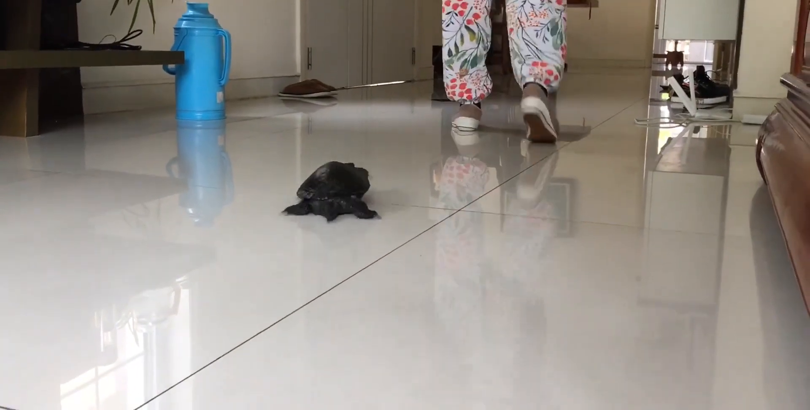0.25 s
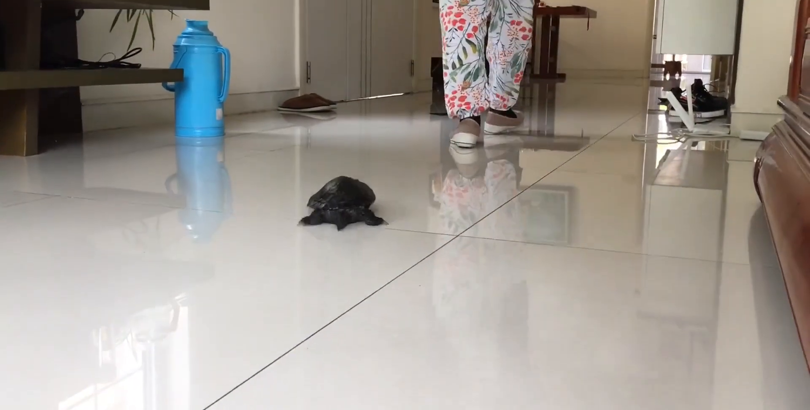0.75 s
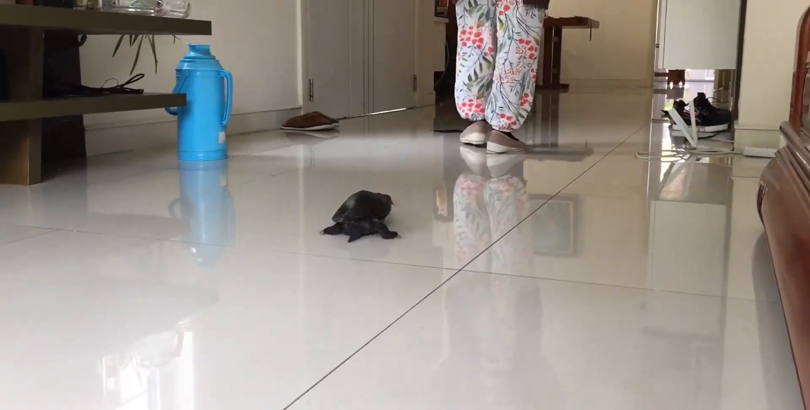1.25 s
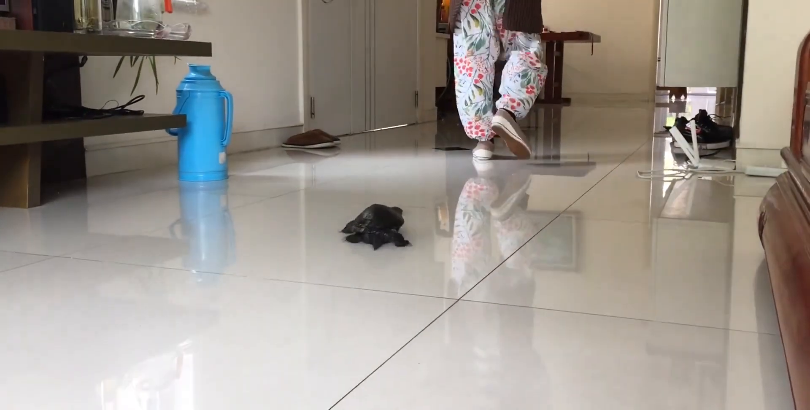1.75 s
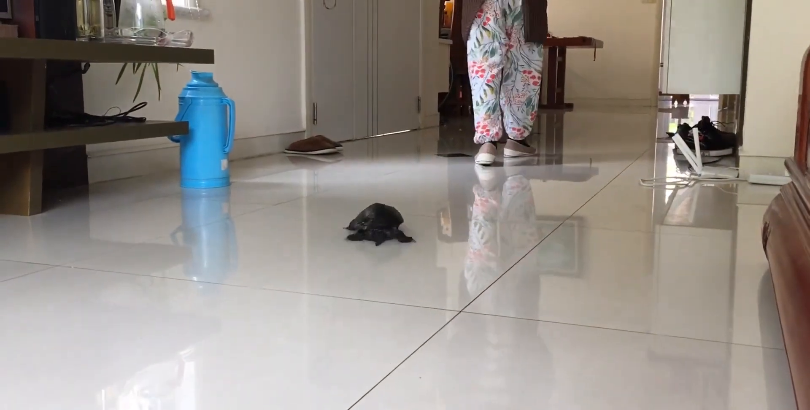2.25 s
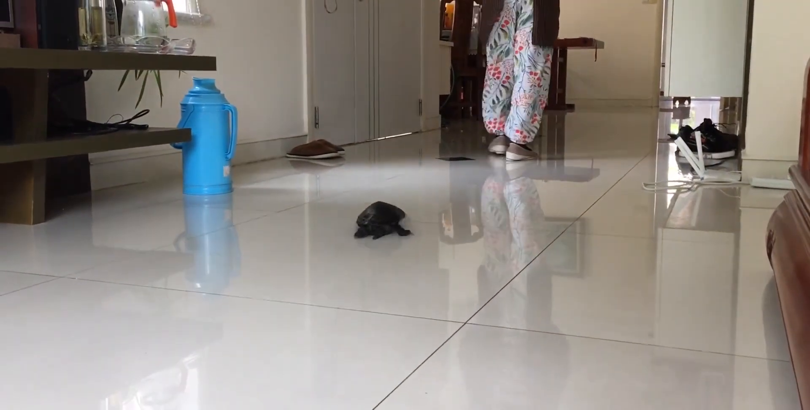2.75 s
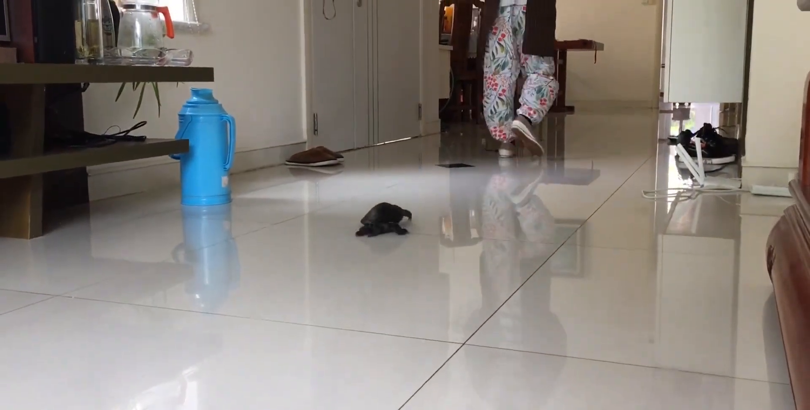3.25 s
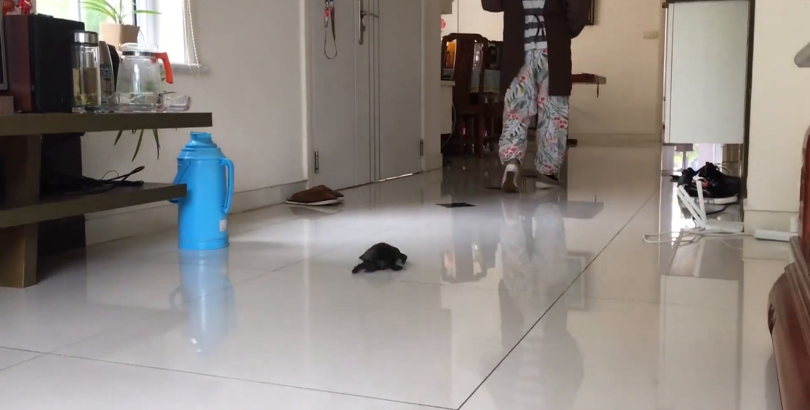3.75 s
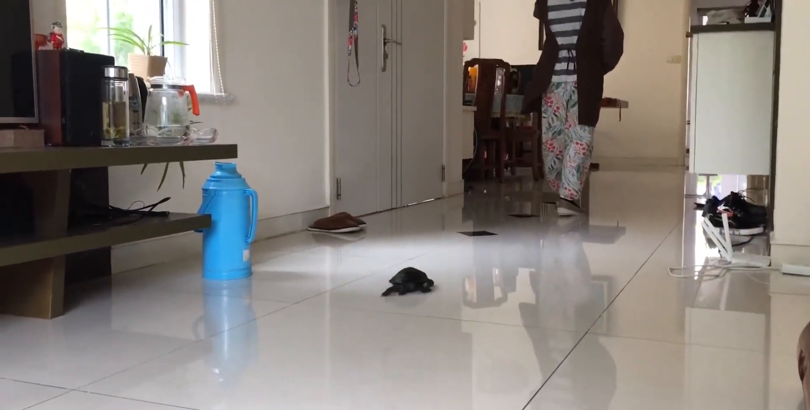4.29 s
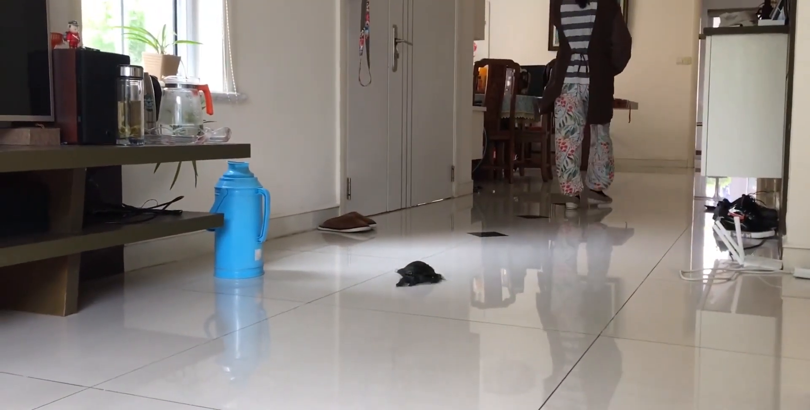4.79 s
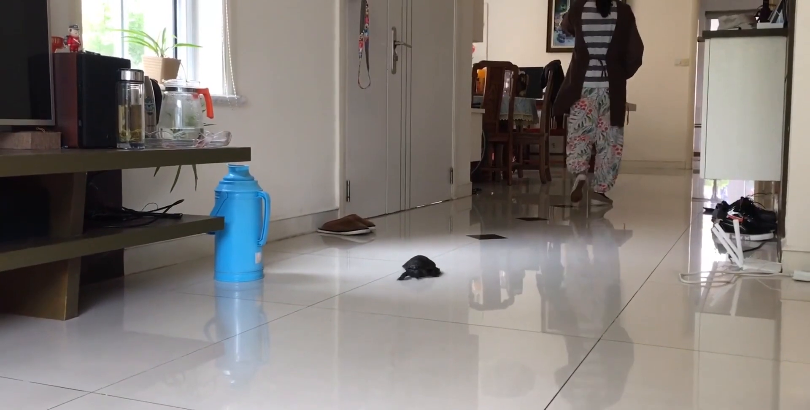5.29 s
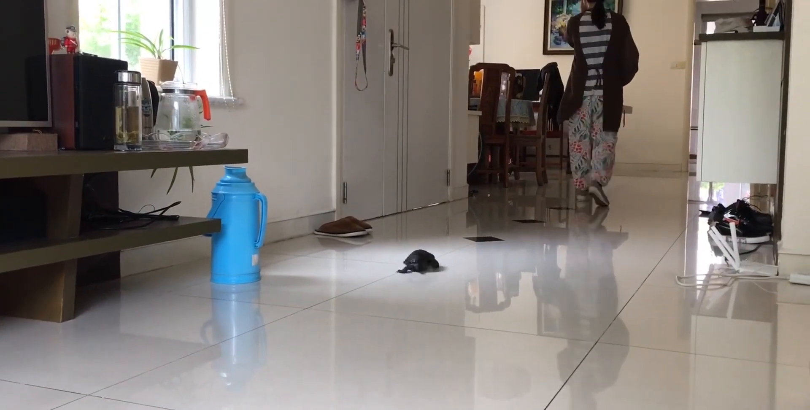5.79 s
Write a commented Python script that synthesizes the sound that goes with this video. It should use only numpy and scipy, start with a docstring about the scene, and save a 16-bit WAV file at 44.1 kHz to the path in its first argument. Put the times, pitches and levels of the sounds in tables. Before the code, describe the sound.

Slippers slap steadily across a hard tile floor indoors, walking away and growing more echoey, with faint trouser swishes.

```python
"""Slippers walking away over hard tiles, 2.5 to about 6 m from a microphone set low in a living room.
Each sole slaps the floor: the foot thuds, trapped air pops, the flat claps, the stiff sole cracks.
Its edge ticks as it bends and touches; it scuffs now and then and squeaks once.
Walls and ceiling answer more and more as the walker recedes, and room modes ring under the steps.
Trousers swish over quiet room tone."""
import sys
import numpy as np
from scipy import signal
from scipy.fft import rfft, irfft, next_fast_len
from scipy.io import wavfile
from scipy.ndimage import uniform_filter1d

SR = 44100
rng = np.random.default_rng(int(sys.argv[2]) if len(sys.argv) > 2 else 0)


def dump(signal):
    """Clip the signal to [-1, 1] and save it as 16-bit WAV at the path in sys.argv[1]."""
    limited = np.clip(np.atleast_2d(signal).T, -1, 1)
    pcm = np.round(limited * 32767).astype(np.int16)
    wavfile.write(sys.argv[1], SR, pcm)


N = 265863
LEAD = int(0.008 * SR)  # samples ahead of each blow, room for the first soft touch
STEP_SPAN, TICK_SPAN = int(0.06 * SR), int(0.007 * SR)  # samples over which a level is set

# the walker's path away from the microphone: t/s, distance/m
WALK = [(0, 2.5), (3, 4.2), (6, 6.2)]
# resonances of the sole's hard skin: f/Hz, width/Hz, level/dB
SNAP = [(5880, 1740, -0.5), (8850, 2060, -8.5), (12200, 2100, -12.5)]


def undb(db):
    """Decibels to gain."""
    return 10 ** (np.asarray(db) / 20)


def level(x, db):
    """Scale to an rms level."""
    return x * undb(db) / np.sqrt(np.mean(x ** 2))


def add(out, x, s):
    """Mix x into out from time s on."""
    start = int(round(s * SR))
    x = x[max(-start, 0):len(out) - start]
    start = max(start, 0)
    out[start:start + len(x)] += x


def resonate(x, hz, width_hz):
    """A damped resonance, applied as a causal band-pass."""
    low = np.hypot(hz, width_hz / 2) - width_hz / 2
    high = min(low + width_hz, SR / 2 - 100)
    return signal.sosfilt(signal.butter(2, [low, high], "band", fs=SR, output="sos"), x + 1e-18)


def ring(drive, modes, db, span=STEP_SPAN):
    """Resonances (f/Hz, width/Hz, level/dB) of alternating sign, at rms db over span samples after LEAD."""
    y = sum((-1) ** k * undb(mode_db) * resonate(drive, hz, width)
            for k, (hz, width, mode_db) in enumerate(modes))
    return y * undb(db) / np.sqrt(np.mean(y[LEAD:LEAD + span] ** 2))


def noise(spectrum):
    """Steady noise of unit rms, shaped by (f/Hz, level/dB) points."""
    hz, db = np.transpose(spectrum)
    size = next_fast_len(N)
    bins_hz = np.maximum(np.fft.rfftfreq(size, 1 / SR), 1)
    gain = undb(np.interp(np.log(bins_hz), np.log(hz), db))
    return level(irfft(rfft(rng.standard_normal(size)) * gain, size)[:N], 0)


def waver(rate_hz):
    """A smooth random curve with a spread near 1, drawn rate_hz times a second."""
    hold = int(SR / rate_hz)
    stairs = np.repeat(rng.standard_normal(N // hold + 1), hold)
    return uniform_filter1d(uniform_filter1d(stairs, hold), hold)[:N]


def swells(rows):
    """Bell-shaped envelopes from rows of middle t/s, length/s, level/dB."""
    t = np.arange(N) / SR
    return sum(undb(db) * np.exp(-2 * ((t - s) / length) ** 2) for s, length, db in rows)


def distance(s):
    """Metres from microphone to walker at time s."""
    return np.interp(s, *np.transpose(WALK))


def room_tone():
    """Quiet room air and a wavering low rumble."""
    # spectrum of the air: f/Hz, relative level/dB
    air_spectrum = [(15, -33), (25, -3), (70, 15.5), (126, 8), (353, -5.5), (525, -4), (846, -8.5),
                    (1190, -7.5), (1920, -9.5), (2570, -11), (4850, -18), (6330, -17), (14000, -25.5)]
    # its slow drift: t/s, level/dB
    air_drift = [(0, -57), (2, -61.5), (3.5, -58), (4.2, -62), (4.8, -61.5), (6.03, -59.5)]
    rumble = level(resonate(rng.standard_normal(N), hz=56, width_hz=39), db=-69)
    air_db = np.interp(np.arange(N) / SR, *np.transpose(air_drift))
    air = noise(air_spectrum) * undb(air_db + waver(3.26))
    return air + rumble * undb(2 * waver(0.68))


def room_response(s, wet_db, build_s=0.0039, grain=0.74, grain_s=0.033, wall_scatter=0.06):
    """From the walker at time s to the microphone: direct sound, echoes, diffuse tail, standing waves."""
    # mirror images in walls and ceiling: sideways offset/m, level/dB
    mirrors = [(4.3, -9), (5.8, -35), (7.6, -18), (9.4, -9)]
    # bands of the diffuse tail: f/Hz, t60/s, relative level/dB
    tail_bands = [(119, 0.66, 11), (243, 0.48, 7.5), (555, 0.53, -0.5), (1380, 0.53, 5), (2370, .58, 3),
                  (3150, 0.54, -3.5), (4360, 0.54, -3), (7140, 0.46, -3), (12800, 0.35, -4)]
    # standing waves: f/Hz, t60/s, relative level/dB at the near end, the same at the far end
    room_modes = [(143.8, 0.6, 2, -45.5), (180, 0.93, -32, -5), (247.4, 0.34, -6, -18.5),
                  (294.3, 0.73, -14.5, -19), (395.3, 0.48, -19, -3.5), (455, 0.22, -17.5, -6),
                  (621, 0.27, -12, -13.5)]
    metres = distance(s)
    size = int(0.9 * SR)
    t = np.arange(size) / SR
    early = np.zeros(size)
    early[0] = 1  # direct sound
    for offset, db in mirrors:
        path = np.hypot(metres, offset * (1 + wall_scatter * rng.standard_normal()))
        lag_s = (path - metres) / 343
        early[int(lag_s * SR)] += undb(db) * metres / path

    # the first echoes come one by one, the late ones merge
    graininess = grain * np.exp(-t / grain_s)
    echoes = rfft(rng.standard_normal(size) * np.exp(graininess * rng.standard_normal(size)))
    log_bins = np.log(np.maximum(np.fft.rfftfreq(size, 1 / SR), 1))
    log_centres = np.log(np.array(tail_bands)[:, 0])
    tail = 0
    for (_, t60, db), this_band in zip(tail_bands, np.eye(len(tail_bands))):
        share = np.interp(log_bins, log_centres, this_band)
        fade = (1 - np.exp(-t / build_s)) * np.exp(-np.log(1000) * t / t60)
        tail += undb(db) * irfft(echoes * share, size) * fade / np.linalg.norm(fade)
    tail_db = wet_db + 4.5 * np.log2(metres / 4)  # gains on the direct sound with distance

    near_m, far_m = WALK[1][1], WALK[-1][1]
    farness = np.clip((metres - near_m) / (far_m - near_m), 0, 1)
    standing = 0
    for hz, t60, near_db, far_db in room_modes:
        mode = np.sin(2 * np.pi * (hz * t + rng.random())) * np.exp(-np.log(1000) * t / t60)
        standing += undb(near_db + farness * (far_db - near_db)) * mode / np.linalg.norm(mode)
    return early + undb(tail_db) * tail + undb(-8) * standing


def rubbing(step_s=0.516, swish_s=0.085, hiss_s=0.014, flutter_db=3, fibre_db=4):
    """Trouser legs brush in uneven folds, with brief hisses; a sliding sole rasps at its bending pitch."""
    # brief high hisses (trouser hem flicks, and the bright snap of the sole's squeak): t/s, level/dB
    brief_hisses = [(0.028, -60), (1.06, -60), (1.604, -59), (1.85, -69), (2.556, -63), (3.575, -66),
                    (4.09, -69), (4.135, -73)]
    # a sole slides lightly: middle t/s, length/s, level/dB
    scuffs = [(1.86, 0.2, -71), (2.47, 0.35, -69.5), (4.2, 0.11, -71.5)]
    friction = noise([(800, -4), (2500, -14), (5000, -15), (9000, -8.5), (14000, -13)])
    friction *= undb(fibre_db * waver(1100))  # single fibres catch and let go
    rasp = level(resonate(rng.standard_normal(N), hz=3140, width_hz=1600), db=0)
    # one swish a step, weaker with distance
    swishes = [(s, swish_s, -73 - 20 * np.log10(distance(s) / 4))
               for s in np.arange(0.23, N / SR, step_s)]
    hisses = [(s, hiss_s, db) for s, db in brief_hisses]
    flutter = undb(flutter_db * waver(140))
    return (friction * swells(swishes + hisses) + rasp * swells(scuffs)) * flutter


def contact(touch_db, touch_s, crush_db, crush_s, early_db=-10, early_s=0.00016):
    """Force on the tile: the sole touches softly, lands flat in one blow, then its tread settles."""
    t = (np.arange(4 * LEAD) - LEAD) / SR
    touching = (t > -touch_s) * (t < 0)
    touch = resonate(touching * rng.standard_normal(len(t)), hz=1590, width_hz=1470)
    # the highest ridges of the tread meet the tile just before the rest
    ridges = np.where(t > 0, np.exp(-np.abs(t) / crush_s), undb(early_db) * np.exp(-np.abs(t) / early_s))
    crush = ridges * rng.standard_normal(len(t))
    blow = rfft((t == 0) + undb(crush_db) * crush / np.linalg.norm(crush))
    # the many tiny contacts spread the blow in time but drive all pitches nearly evenly
    even_blow = irfft(blow / np.abs(blow) ** 0.7, len(t))
    return even_blow + undb(touch_db) * touch / np.linalg.norm(touch)


def light_touch(s):
    """A contact with little weight behind it, heard through the room."""
    force = contact(touch_db=-40, touch_s=0.0047, crush_db=-1.5, crush_s=0.00081)
    return signal.fftconvolve(force, room_response(s, wet_db=-2))


def squeak(s=1.603, hz=1650, width_hz=240, db=-51.5):
    """The sole catches on the tile once and rings briefly."""
    out = np.zeros(N)
    add(out, ring(light_touch(s), [(hz, width_hz, 0)], db, TICK_SPAN), s - LEAD / SR)
    return out


def sole_ticks(edge_width_hz=870, knock_hz=600, knock_width_hz=800):
    """The stiff edge of the sole clicks on the tile, duller from farther away."""
    # light touches of the edge: t/s, level/dB, f/Hz
    ticks = [(0.016, -48, 2930), (0.075, -48.5, 3160), (0.5208, -41, 2730), (0.9435, -62, 2900),
             (1.074, -49.5, 3000), (1.5361, -46.5, 2600), (2.017, -40.5, 2780), (3.074, -46, 2510),
             (3.2966, -49, 2720), (3.624, -53, 2780), (3.699, -54.5, 3030), (3.7978, -49, 2640),
             (3.8944, -47, 2740), (4.1506, -61, 2780), (4.39, -64, 2550)]
    out = np.zeros(N)
    for s, db, hz in ticks:
        drive = light_touch(s)
        edge = ring(drive, [(hz, edge_width_hz, 0)], 0, TICK_SPAN)
        snap = ring(drive, SNAP, -17 - 12 * np.log2(distance(s) / 4), TICK_SPAN)
        knock = ring(drive, [(knock_hz, knock_width_hz, 0)], -15, TICK_SPAN)
        add(out, undb(db) * (edge + snap + knock), s - LEAD / SR)
    return out


def footsteps(firm_db=-42, thud_hz=157, body_hz=268.8, crack_hz=3187, crack_width_hz=1270):
    """Slaps on tile: trapped air pops; weight adds thud and body, hardness the clap, crack and snap."""
    # blows of heel and sole: t/s, strength/dB, foot's weight/dB, hardness/dB, air pop f/Hz, clap f/Hz
    blows = [(0.0824, -39.5, 1, -16, 460, 1274), (0.1846, -35.5, 4.5, -20, 462, 1480),
             (0.566, -51, 6, -39, 485, 1270), (0.5948, -35.5, 7, -8.5, 485, 1365),
             (1.102, -39.5, 8, -7.5, 535, 1380), (1.188, -49, -11, -19, 513, 1360),
             (1.5373, -62.5, 10.5, 1, 570, 1350), (1.688, -59.5, 7, -15, 516, 1430),
             (2.0368, -37, 7.5, 0.5, 516, 1400), (2.0426, -40.5, 6, -11, 593, 2140),
             (2.1544, -42, 8, -5, 550, 1470), (2.588, -36, 5.5, -6.5, 475, 1290),
             (2.756, -37, 4, -15.5, 416, 1210), (2.8132, -39, 3, 0.5, 495, 1120),
             (3.074, -59.5, 1.5, 0.5, 484, 1430), (3.2962, -52, 3, -24, 454, 1300),
             (3.3152, -29.5, -7, -14, 485, 1265), (3.6032, -50, 1, -2, 530, 1330),
             (3.8128, -37.5, -4.5, -19.5, 455, 1000), (4.09, -50.5, -3, -18.5, 386, 1140),
             (4.391, -62.5, 2.5, -8, 440, 1290), (4.6897, -53, -1.5, -2, 400, 1380),
             (4.873, -40.5, -6, -15, 506, 1410), (5.1802, -33.5, -7.5, 0, 601, 1290),
             (5.453, -45.5, -1.5, -17.5, 427, 1120), (5.6936, -38, -5, -21.5, 448, 1330)]
    # the sole's two bending modes: ratio to crack_hz, level/dB
    bending_modes = [(0.84, 3.5), (1.17, 0.5)]
    bending = [(ratio * crack_hz, crack_width_hz, db) for ratio, db in bending_modes]
    out = np.zeros(N)
    for s, strength, weight, hardness, pop_hz, clap_hz in blows:
        force = contact(touch_db=-15, touch_s=0.003, crush_db=3.5, crush_s=0.0011)
        drive = signal.fftconvolve(force, room_response(s, wet_db=0.5))
        # with distance the deep thud gives way to the sole's body
        doublings = np.log2(distance(s) / 4)
        # a gentle footfall presses longer (more thud), a firm one expels the air faster (more clap)
        firmness = strength - firm_db
        thud = ring(drive, [(thud_hz, 89.5, 0)], weight - 7 - 1.5 * doublings - 0.35 * firmness)
        body = ring(drive, [(body_hz, 93, 0)], weight - 8.5 + 3.1 * doublings)
        pop = ring(drive, [(pop_hz, 0.6 * pop_hz, 0)], db=1)
        clap = ring(drive, [(clap_hz, 0.55 * clap_hz, 0)], 0.43 * hardness + 0.17 * firmness - 6)
        crack = ring(drive, bending, hardness - 0.3)
        snap = ring(drive, SNAP, 0.86 * hardness - 13)
        slap = thud - body + pop - clap + crack + snap  # neighbouring resonances swing in opposite senses
        add(out, undb(strength) * slap, s - LEAD / SR)
    return out


def scene():
    """Steps, ticks, a squeak and rubbing over the room tone, in mono."""
    return (footsteps() + sole_ticks() + squeak() + rubbing() + room_tone())[None]


def record(dry, top_hz=14500):
    """The recorder cuts the treble steeply above top_hz."""
    return signal.sosfilt(signal.ellip(10, 0.2, 70, top_hz, fs=SR, output="sos"), dry)


dry = scene()
out = record(dry)
dump(out)
```